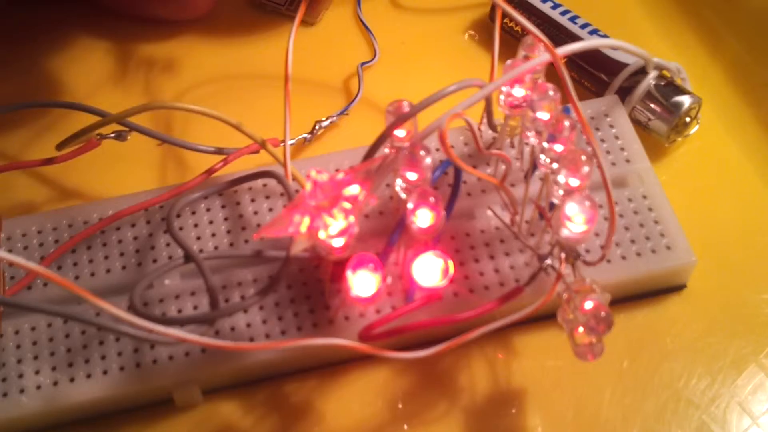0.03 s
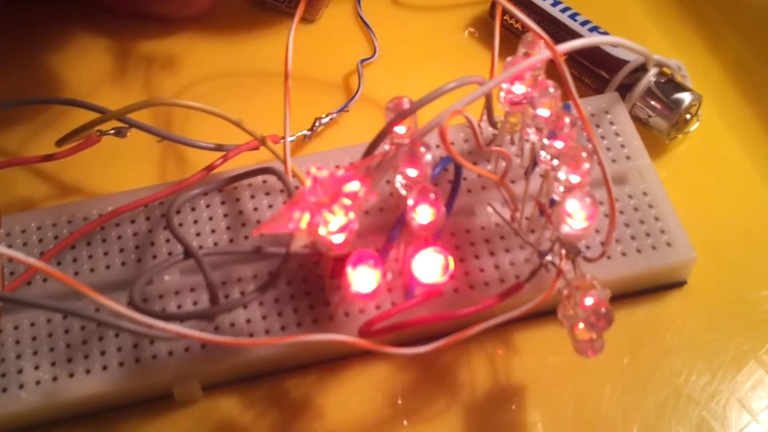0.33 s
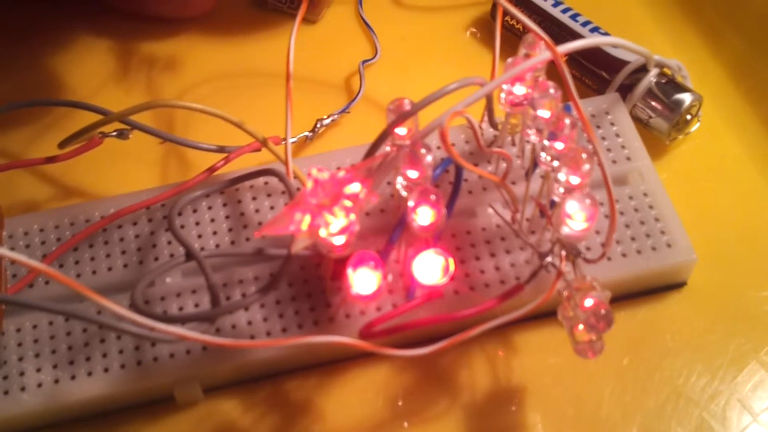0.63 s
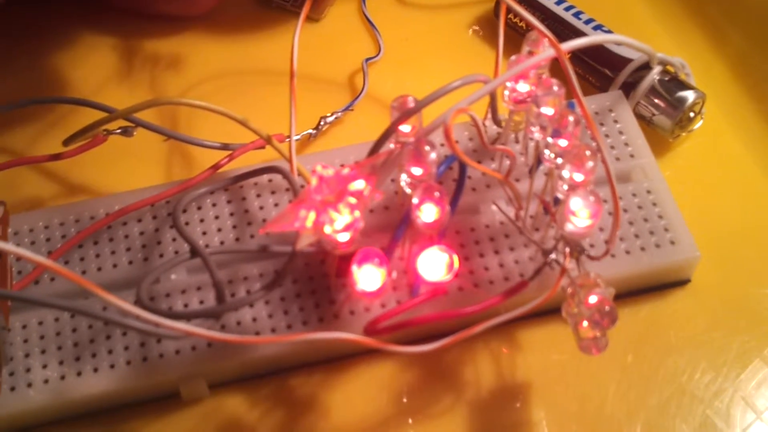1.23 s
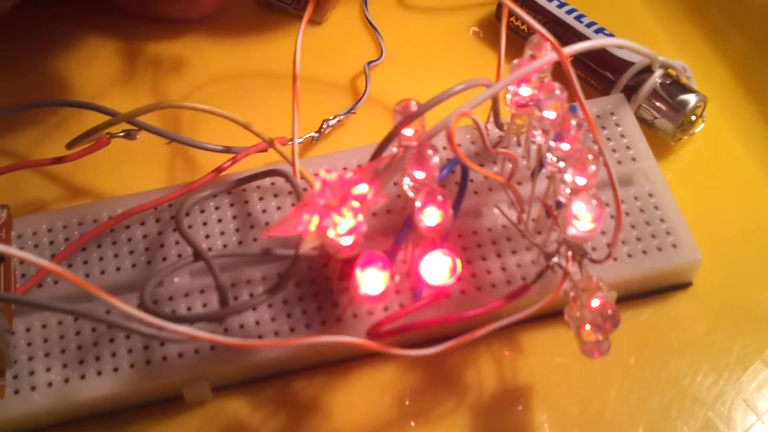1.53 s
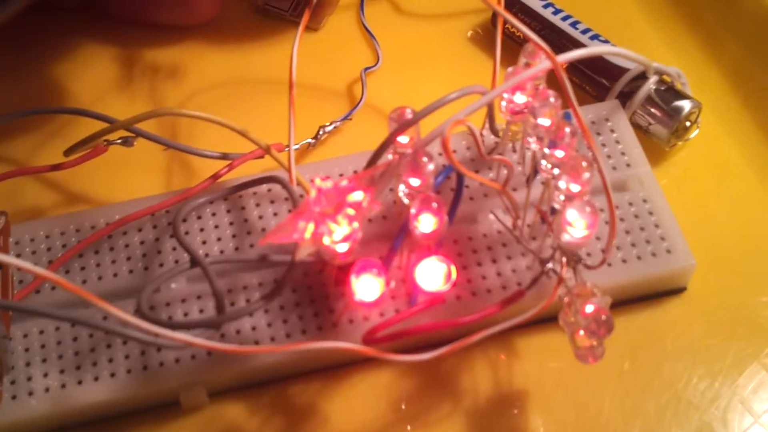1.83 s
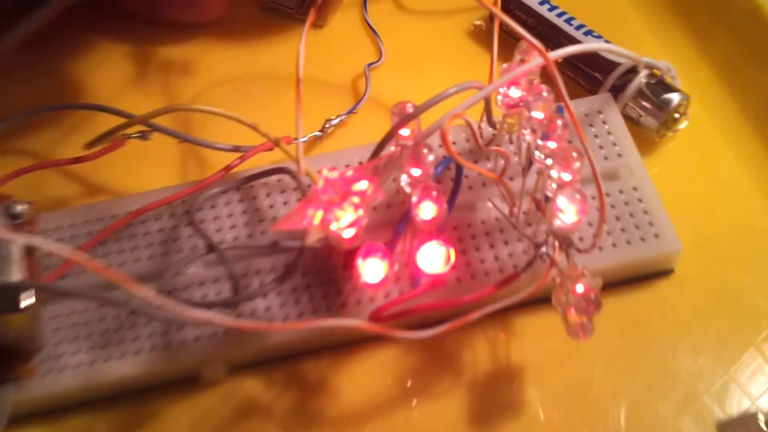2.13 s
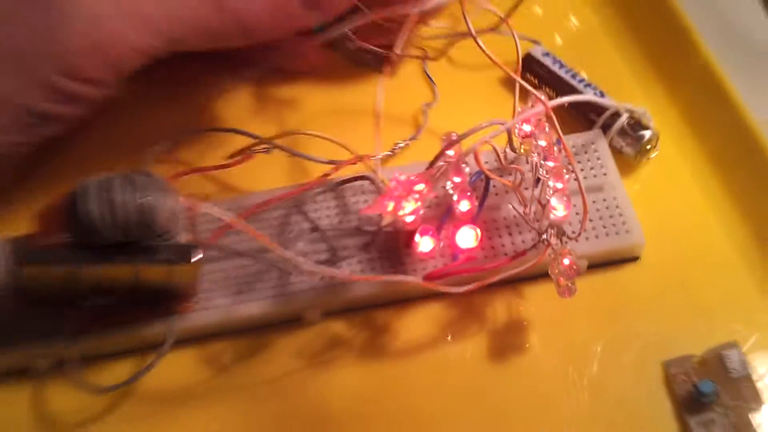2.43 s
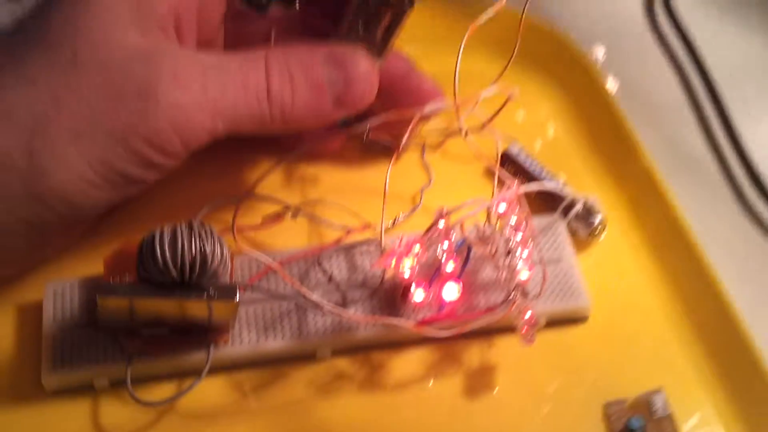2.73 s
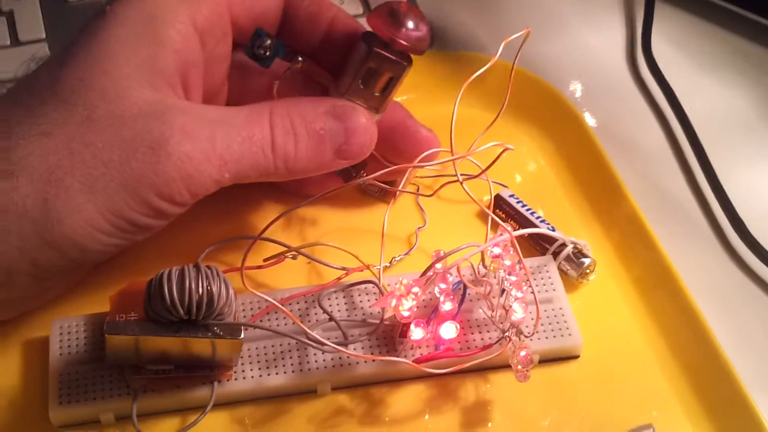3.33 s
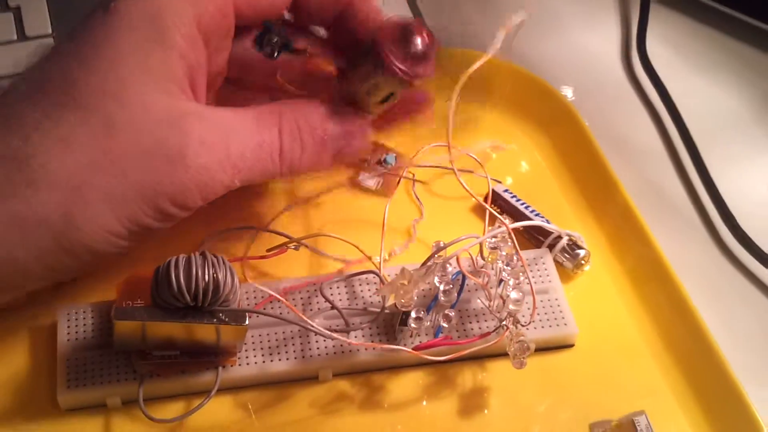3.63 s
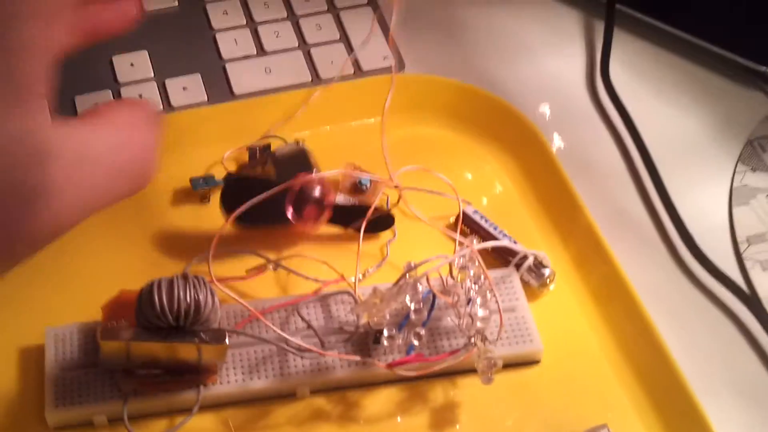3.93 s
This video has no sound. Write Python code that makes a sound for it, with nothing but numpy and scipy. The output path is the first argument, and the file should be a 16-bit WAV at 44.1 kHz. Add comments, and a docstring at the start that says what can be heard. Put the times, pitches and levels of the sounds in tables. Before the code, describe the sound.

Close up in a small room, a little motor runs with a thin, hissy buzz. A wire scrapes briefly over faint microphone handling. The motor stops and drops on a plastic tray with a loud knock, then small clicks.

```python
"""Small motor running down and dropped

A tiny three-pole motor, wired to an LED circuit, buzzes in a hand: its brushes tick over the commutator
and hiss. It is brought nearer with a light scrape of wire, loses power and runs down, then drops on a
plastic tray in a small room. The impacts excite the tray's modes; the hardest overloads the microphones."""
import sys
import numpy as np
from scipy import signal
from scipy.fft import rfft, irfft, next_fast_len
from scipy.io import wavfile
from scipy.ndimage import uniform_filter1d

SR = 44100
rng = np.random.default_rng(int(sys.argv[2]) if len(sys.argv) > 2 else 0)


def master_out(mix):
    """Clip the mix to full scale and print it as 16-bit PCM to the path in sys.argv[1]."""
    frames = np.transpose(np.atleast_2d(mix))
    ceiling = np.clip(frames, -1, 1)
    pcm = np.round(ceiling * 32767).astype(np.int16)
    wavfile.write(sys.argv[1], SR, pcm)


N = 176400
TIME = np.arange(N) / SR


def undb(db):
    """Amplitude ratio of a level in decibels."""
    return 10 ** (np.asarray(db) / 20)

def unit(x):
    """Normalisation to an rms of 1."""
    return x / np.sqrt(np.mean(x ** 2))

def curve(rows):
    """Linear interpolation of (time [s], value) rows."""
    return np.interp(TIME, *np.array(rows, float).T)

def colour(x, rows):
    """Minimum-phase filter through (frequency [Hz], gain [dB]) rows."""
    rows, size = np.array(rows, float), next_fast_len(x.shape[-1] + 4096) * 2
    hz = np.maximum(np.fft.rfftfreq(size, 1 / SR), 1)
    gain = undb(np.interp(np.log(hz), np.log(rows[:, 0]), rows[:, 1]))
    cepstrum = irfft(np.log(gain))
    cepstrum[1:size // 2] *= 2  # folding makes the filter causal
    cepstrum[size // 2 + 1:] = 0
    return irfft(rfft(x, size) * np.exp(rfft(cepstrum)))[..., :x.shape[-1]]

def resonate(x, peaks):
    """Resonances (frequency [Hz], width [Hz], gain [dB]) add in power to form one filter."""
    hz = np.arange(100, SR / 2, 20)
    power = sum(undb(db) ** 2 / (1 + (1.3 * (hz - centre) / width) ** 2) ** 2
                for centre, width, db in peaks)
    return colour(x, np.c_[hz, 10 * np.log10(power)])

def whiten(x, smoothing_hz=350):
    """Spectral whitening evens out the broad colour and keeps the fine lines."""
    spectrum = rfft(x)
    power = uniform_filter1d(np.abs(spectrum) ** 2, int(smoothing_hz * N / SR))
    return irfft(spectrum / np.sqrt(power + 1e-9), N)

def pulses(times, sizes):
    """Band-limited impulses: a windowed sinc places each between samples."""
    at = times[:, None] * SR
    taps = np.floor(at).astype(int) + np.arange(-7, 9)
    shape = np.sinc(taps - at) * np.cos(np.pi * (taps - at) / 16) ** 2
    return np.bincount(np.clip(taps, 0, N).ravel(), (shape * sizes[:, None]).ravel(), N + 1)[:N]

def convolve(x, response):
    """Convolution with an impulse response."""
    return signal.fftconvolve(np.atleast_2d(x), response, axes=1)[:, :N]

def add(out, start, sound):
    """Superposition of a sound from a start time [s]."""
    i = int(start * SR)
    out[:, i:i + sound.shape[1]] += sound[:, :max(N - i, 0)]

# Stereo width of diffuse sound (frequency [Hz], side over mid [dB])
SIDE_OVER_MID = [(50, -1), (120, 6), (250, 8), (600, 5.5), (2500, .5)]
def widen(pair):
    """Mid-side mixing: where the side dominates, the two microphones are in opposite phase."""
    mid = colour(pair[0], [(hz, -10 * np.log10(1 + undb(db) ** 2)) for hz, db in SIDE_OVER_MID])
    side = colour(pair[1], [(hz, -10 * np.log10(1 + undb(-db) ** 2)) for hz, db in SIDE_OVER_MID])
    return np.array([mid + side, mid - side])

def diffuse(spectrum, size=N):
    """A diffuse field: coloured noise, partly correlated between the microphones."""
    return unit(colour(widen(rng.standard_normal((2, size))), spectrum))


# Spectrum of the room tone (frequency [Hz], relative level [dB])
AIR_SPECTRUM = [(45, -29), (110, -6.5), (1500, -8), (4500, -4.5), (7000, -8)]
def room_tone(level_db=-49):
    """Ambient noise forms a steady diffuse field."""
    return undb(level_db) * diffuse(AIR_SPECTRUM)

# Envelope of the handling noise (time [s], level [dB])
HANDLING_LEVEL = [(1.9, -87), (2.0, -48), (2.3, -52), (2.6, -67), (3.4, -78), (3.85, -49)]
# Its spectrum (frequency [Hz], relative level [dB])
HANDLING_SPECTRUM = [(25, -54), (130, -8.5), (280, -2), (2000, -29.5)]
def handling():
    """Structure-borne noise: handling the microphones makes a low rumble."""
    return diffuse(HANDLING_SPECTRUM) * undb(curve(HANDLING_LEVEL))

# Spectrum of the room's echoes (frequency [Hz], relative level [dB])
ECHO_SPECTRUM = [(90, -4.5), (400, 6), (1250, 6), (2400, -4), (3800, -0.5), (14000, -11)]
def reverberation(x, t60_s=.36, onset_s=.0015, gain_db=-5):
    """Dense reflections in a small room build up quickly and decay exponentially."""
    t = np.arange(SR // 2) / SR
    envelope = undb(-60 * t / t60_s) * (1 - np.exp(-t / onset_s))
    tail = diffuse(ECHO_SPECTRUM, len(t)) * envelope
    return undb(gain_db) * convolve(x.mean(axis=0), unit(tail) / np.sqrt(len(t)))

# Spectrum of one catch or snap (frequency [Hz], relative level [dB])
SNAP_SPECTRUM = [(300, -2), (3800, 7.5), (6500, 3), (14000, -2)]
# Colour of the scraping wire (frequency [Hz], gain [dB])
SCRAPE_COLOUR = [(1200, -28), (1680, 0), (2100, -1.5), (2850, -5), (3300, 6), (3700, -2), (4700, -3),
                 (6000, -25)]
# Envelope of the scrape (time [s], level [dB])
SCRAPE_ENVELOPE = [(2.372, -72), (2.3745, -34.5), (2.392, -35), (2.415, -41), (2.5, -45), (2.6, -62)]
# Snaps of the wiring (time [s], level [dB])
WIRE_SNAPS = [(3.761, -25), (3.9725, -24)]
def wiring(catches_per_s=1200, spread_db=2, catch_decay_s=.0003, snap_decay_s=.00081):
    """Stick-slip friction: a pulled wire scrapes in tiny random catches. Two small snaps come later."""
    t = np.arange(SR // 10) / SR
    catch = diffuse(SNAP_SPECTRUM, len(t)) * np.exp(-t / catch_decay_s)
    when, strength = rng.random((N, 2))[:int(catches_per_s * N / SR)].T
    slips = pulses(when * N / SR, undb(-spread_db * np.log(strength + .001)))
    out = unit(colour(convolve(slips, catch), SCRAPE_COLOUR)) * undb(curve(SCRAPE_ENVELOPE))
    for start, db in WIRE_SNAPS:
        add(out, start, undb(db) * diffuse(SNAP_SPECTRUM, len(t)) * np.exp(-t / snap_decay_s))
    return out + reverberation(out)

# Modes of the tray and motor case (frequency [Hz], relative level [dB])
TRAY_MODES = [(345, -11), (680, -6), (1164, 1), (1231, -2), (1372, 0), (1602, -3), (1724, -2), (1794, -1),
              (2027, 1), (2126, -3), (3052, 1), (3200, -1), (3790, -4)]
def tray_ring(t, t60_s=.3):
    """Free vibration: damped modes reach each microphone with their own phase."""
    return widen(sum(undb(db - 60 * t / t60_s) * np.sin(2 * np.pi * (hz * t + rng.random((2, 1))))
                     for hz, db in TRAY_MODES))

# Blows on the tray (time [s], level [dB], treble gain [dB])
BLOWS = [(3.4597, -23, -18), (3.554, -11, -0.5), (3.6055, -16.5, 0), (3.6217, -14, 5.5), (3.654, 6.5, -2.5),
         (3.657, -2.5, -17.5), (3.665, -6.5, 5.5), (3.674, -7.5, 7.5), (3.836, -30, 5),
         (3.8443, -20.5, -21), (3.856, -38, 13)]
# Spectrum of a blow (frequency [Hz], relative level [dB])
CRACK_SPECTRUM = [(30, -52), (90, -13), (170, -16), (300, -10.5), (800, -8.5), (1200, 0), (2300, -1.5),
                  (3400, 2), (5900, -14.5), (14000, -25.5)]
def tray_impacts(crack_decay_s=.0036, ring_db=-30, bass_hz=617, bass_per_db=.74, treble_hz=6230):
    """Impact excitation: each blow of the motor cracks and rings the tray; harder blows have more bass."""
    cracks, rings = np.zeros((2, 2, N))
    t = np.arange(SR // 2) / SR
    fade = np.exp(-t / crack_decay_s)
    for start, db, treble_db in BLOWS:
        burst = widen(fade * rng.standard_normal((2, len(t))))
        crack = unit(colour(burst, CRACK_SPECTRUM)) * np.sqrt(np.mean(fade ** 2))
        shelves = [(bass_hz, bass_per_db * db), (2 * bass_hz, 0),
                   (treble_hz / np.sqrt(2), 0), (treble_hz * np.sqrt(2), treble_db)]
        add(cracks, start, undb(db) * colour(crack, shelves))
        add(rings, start, undb(db + ring_db) * colour(tray_ring(t), shelves))
    return cracks + reverberation(cracks) + rings

# Spectrum of brush and bearing friction (frequency [Hz], relative level [dB])
RUB_SPECTRUM = [(50, -42), (110, -7), (250, 2), (800, -1), (1400, -.5), (2600, -4), (4000, -4.5),
                (8000, -8), (14000, -12)]
def rubbing(turns, level_db=-44, depth=.15):
    """Amplitude modulation: friction noise swells once a turn."""
    return undb(level_db) * diffuse(RUB_SPECTRUM) * (1 + depth * np.cos(2 * np.pi * turns))

# Low shaft harmonics (multiple of the turn rate, relative level [dB])
HUM_HARMONICS = [(2, -68.5), (4, -60), (5, -71.5), (6, -65.5), (10, -63)]
def shaft_hum(turns, mid_db=-9, side_db=-5):
    """Periodic rotation hums at harmonics of the turn rate."""
    mid, side = (sum(np.sqrt(2) * undb(db) * np.sin(2 * np.pi * (k * turns + rng.random()))
                     for k, db in HUM_HARMONICS) for _ in range(2))
    return undb(mid_db) * mid + undb(side_db) * side * np.array([[1], [-1]])

MOVE_S = (1.8, 2.94)  # the motor travels from one side to above the tray
# High shaft harmonics (multiple of the turn rate, level aside [dB], level above the tray [dB])
WHINE_HARMONICS = [(56, -62, -73), (81, -54, -74), (95, -68, -61)]
def shaft_whine(turns):
    """High harmonics of the rotation reach the two microphones in phase quadrature."""
    quadrature = np.array([[0], [np.pi / 2]])
    return sum(np.sqrt(2) * undb(np.interp(TIME, MOVE_S, levels))
               * np.sin(2 * np.pi * (k * turns + rng.random()) + quadrature)
               for k, *levels in WHINE_HARMONICS)

# Brush contacts (place in the turn [0-1], relative level [dB], gain at ring_hz [dB])
BRUSH_CONTACTS = [(.245, 0, -3), (.42, -13, 0), (.578, -2, 7), (.76, -13, 0), (.912, -1, -3)]
def commutator(turns, ring_hz=7900, jitter_s=3e-6, scatter_db=.6, spark_db=-12):
    """A periodic pulse train: each contact repeats its own tick once a turn, with a spurt of spark noise."""
    rise_s, decay_s, tail_s, tail_db = .0003, .0011, .007, -21
    age = np.arange(SR // 20) / SR
    fade = (np.exp(-age / decay_s) + undb(tail_db) * np.exp(-age / tail_s)) * (1 - np.exp(-age / rise_s))
    ticks, spark_power = 0, 0
    for place, db, ring_db in BRUSH_CONTACTS:
        times = np.interp(np.arange(int(turns[-1])) + place, turns, TIME)
        jitter, scatter = rng.standard_normal((SR // 100, 2))[:len(times)].T
        sizes = undb(db + scatter_db * scatter)
        burst = fade * rng.standard_normal((2, len(age)))
        tick = colour(burst, [(.85 * ring_hz, 0), (ring_hz, ring_db), (1.2 * ring_hz, 0)])
        ticks += convolve(pulses(times + jitter_s * jitter, sizes), tick)
        spark_power += convolve(pulses(times, sizes ** 2), fade[None] ** 2)
    sparks = undb(spark_db) * np.sqrt(np.abs(spark_power)) * rng.standard_normal((2, N))
    return whiten(ticks + sparks)

# Resonances of the motor (frequency [Hz], width [Hz], then relative gains:
# left aside [dB], right aside [dB], left above the tray [dB], right above the tray [dB])
CASE_RESONANCES = [(3850, 500, -5, -2, -18, -5), (4450, 350, -5, 3, -13, -5), (5180, 400, -9, -7, -5, -6),
                   (6260, 500, -7, -7, -2, -5), (7980, 1030, -5, -7, -24, -12),
                   (9340, 1200, -6, -14, -13, -12), (10620, 800, -10, -3, -5, -10),
                   (12010, 970, 1, -2, -2, -4), (13370, 500, 0, 1, -6, -1), (14260, 740, -7, -1, -3, -3)]
# Flares as the motor is turned (time [s], half length [s], frequency [Hz], width [Hz], gain [dB])
SIZZLE_FLARES = [(2.2, .09, 13700, 1400, -4), (3.44, .07, 11700, 1400, -5)]
# Envelope of the ticking (time [s], level [dB])
SIZZLE_LEVEL = [(2.08, -38.9), (2.3, -41.3), (2.6, -41.7), (3.3, -41), (3.46, -39.5), (3.6, -44),
                (3.68, -75)]
def motor_case(buzz):
    """Forced vibration: resonances shape the buzz into a sizzle whose colour shifts as the motor moves."""
    hz, width, *gains = np.array(CASE_RESONANCES).T
    left_right = [resonate(channel, zip(hz, width, db)) for channel, db in zip([*buzz, *buzz], gains)]
    aside, above = unit(np.array(left_right[:2])), unit(np.array(left_right[2:]))
    moved = np.interp(TIME, MOVE_S, (0, 1))
    sizzle = aside * (1 - moved) + above * moved
    flares = sum(resonate(sizzle, [peak]) * np.exp(-((TIME - at) / half_length) ** 2)
                 for at, half_length, *peak in SIZZLE_FLARES)
    return (sizzle + flares) * undb(curve(SIZZLE_LEVEL))

# Rotation of the shaft (time [s], speed [turns/s])
SHAFT_SPEED = [(0, 54.1), (.62, 54.1), (.9, 54.4), (1.55, 54.2), (1.95, 53.7), (3.385, 53.6), (3.55, 26),
               (3.77, 0)]
def motor(full_speed=54):
    """Rotation sets pitch and tick rate; the power of rub, hum and whine is proportional to speed."""
    speed = np.maximum(curve(SHAFT_SPEED), 1e-6)
    turns = np.cumsum(speed) / SR
    drone = rubbing(turns) + shaft_hum(turns)
    sizzle = motor_case(commutator(turns))
    return sizzle + (drone + shaft_whine(turns)) * np.sqrt(speed / full_speed)

def scene():
    """Superposition of the motor, its impacts and the wire over handling rumble and room tone."""
    return motor() + tray_impacts() + wiring() + handling() + room_tone()

def record(dry, clip_level=.91, cutoff_hz=14600):
    """Overload: hard clipping flattens the loudest knock, then a low-pass filter cuts the top."""
    lowpass = signal.ellip(10, .2, 70, cutoff_hz, fs=SR, output="sos")
    return signal.sosfilt(lowpass, np.clip(dry, -clip_level, clip_level))


dry = scene()
out = record(dry)
master_out(out)
```